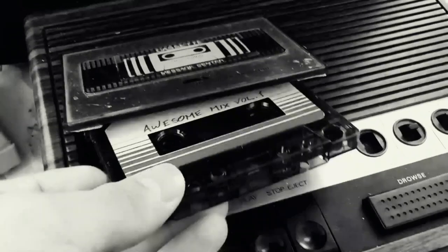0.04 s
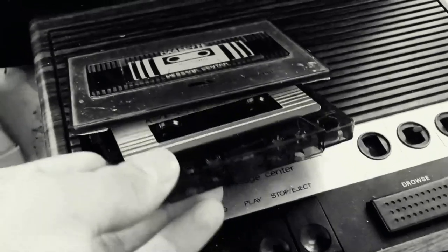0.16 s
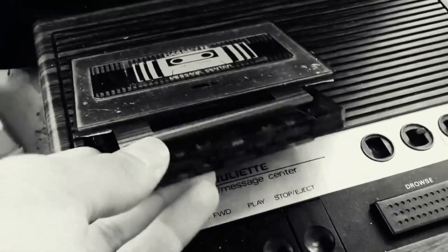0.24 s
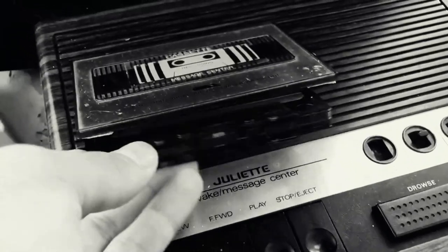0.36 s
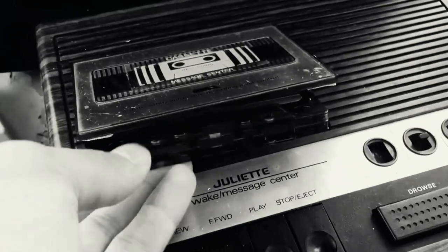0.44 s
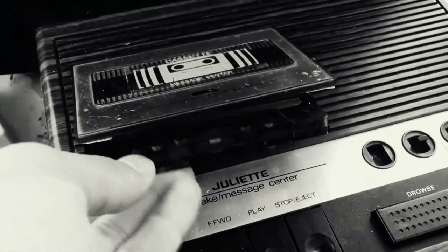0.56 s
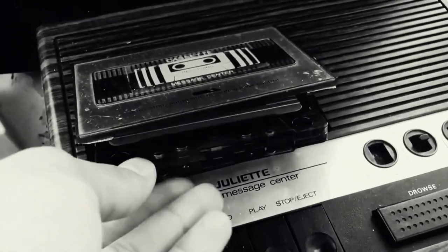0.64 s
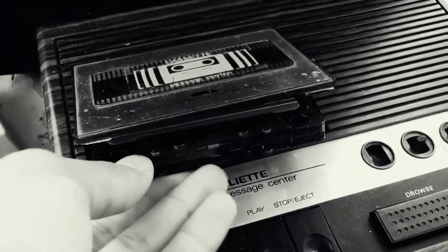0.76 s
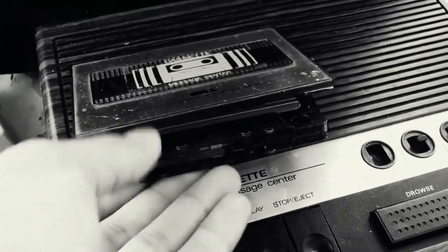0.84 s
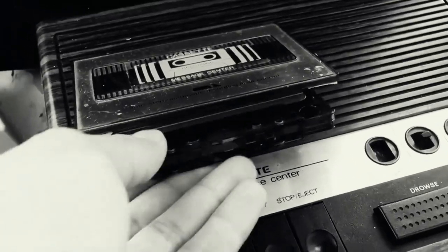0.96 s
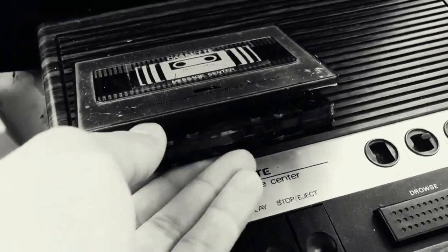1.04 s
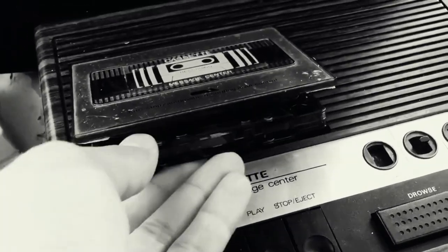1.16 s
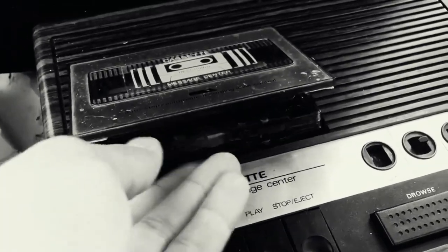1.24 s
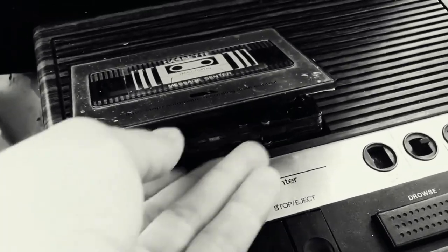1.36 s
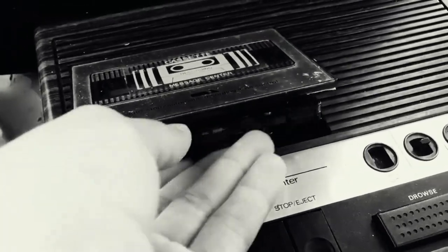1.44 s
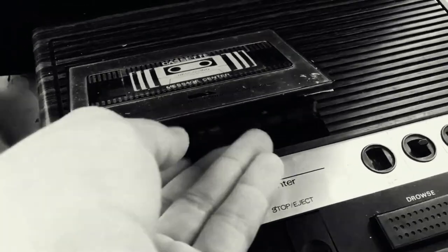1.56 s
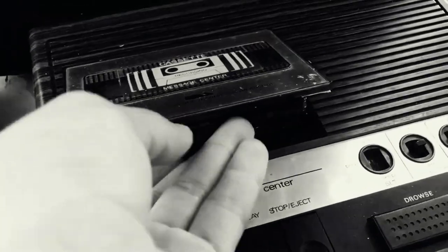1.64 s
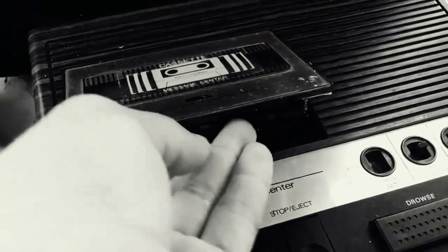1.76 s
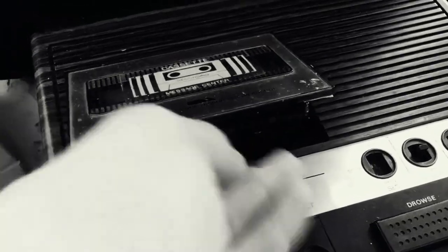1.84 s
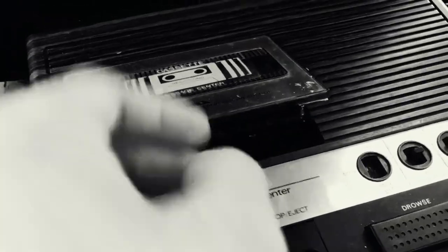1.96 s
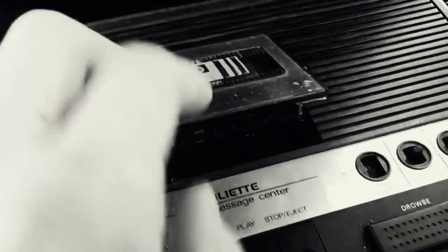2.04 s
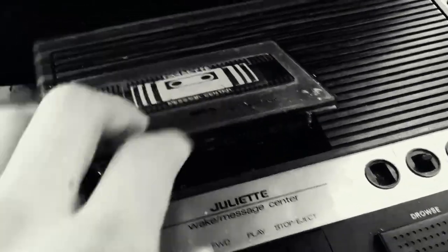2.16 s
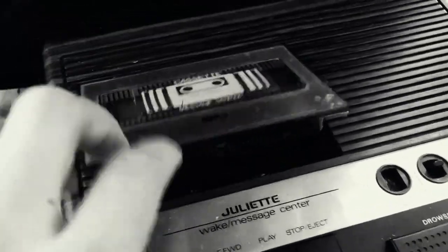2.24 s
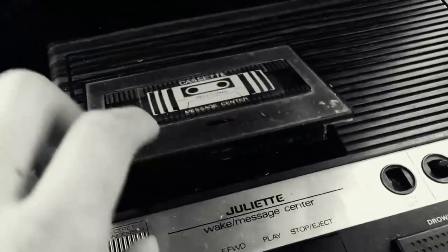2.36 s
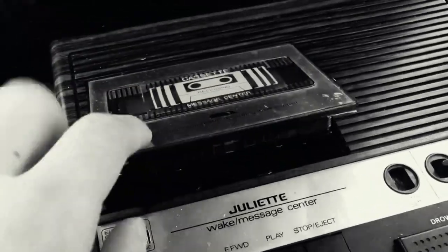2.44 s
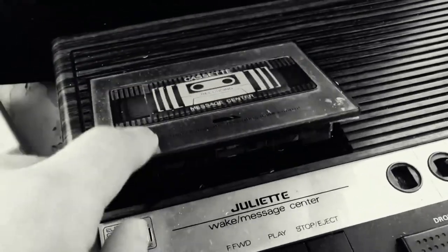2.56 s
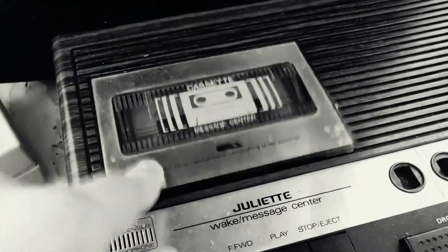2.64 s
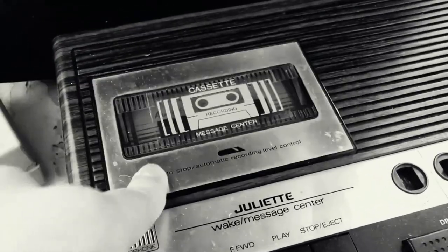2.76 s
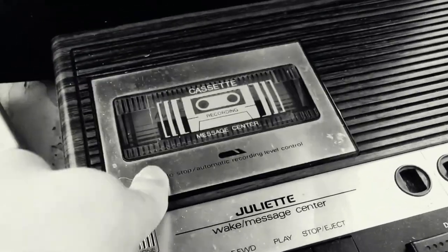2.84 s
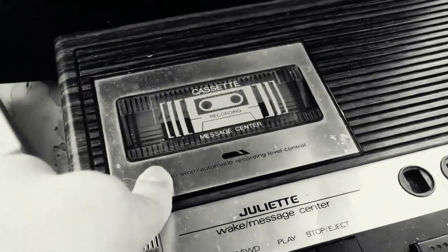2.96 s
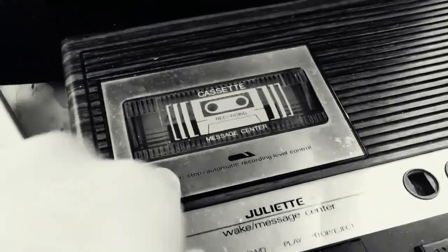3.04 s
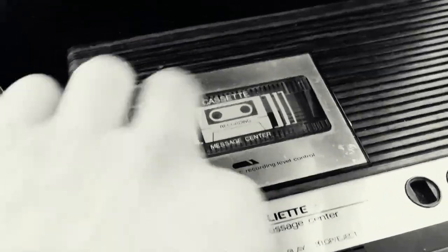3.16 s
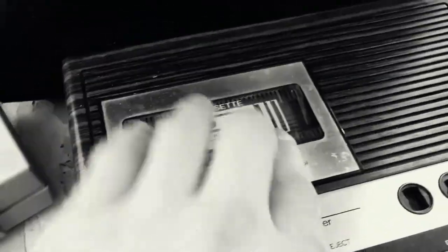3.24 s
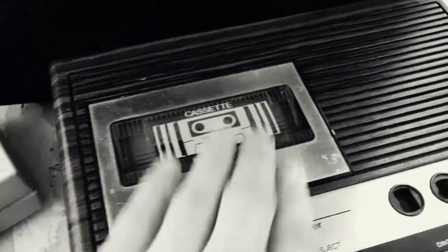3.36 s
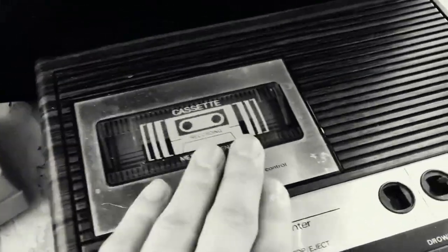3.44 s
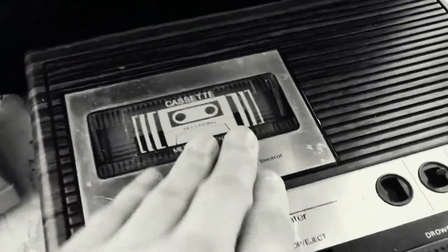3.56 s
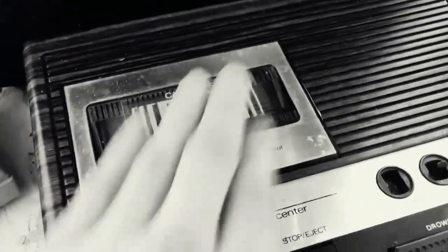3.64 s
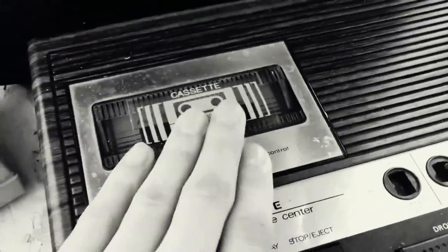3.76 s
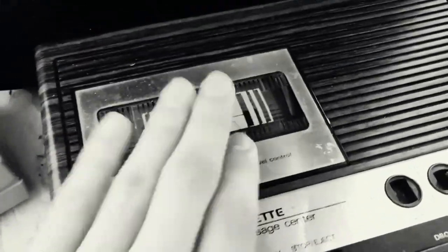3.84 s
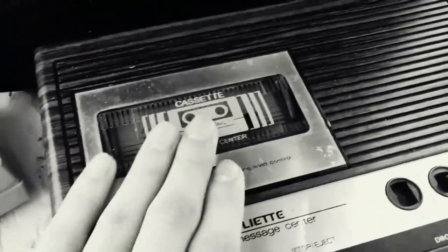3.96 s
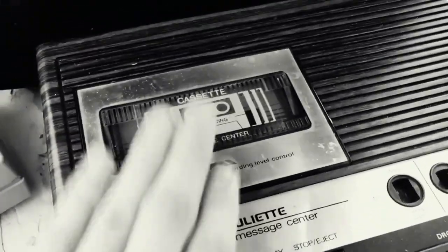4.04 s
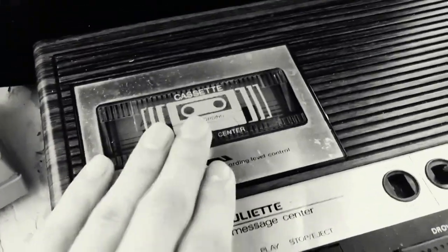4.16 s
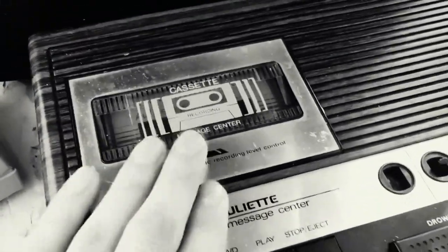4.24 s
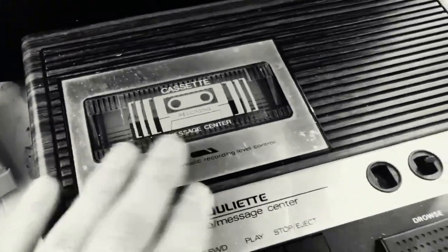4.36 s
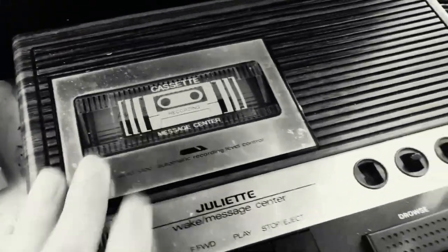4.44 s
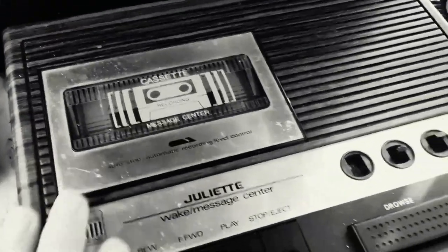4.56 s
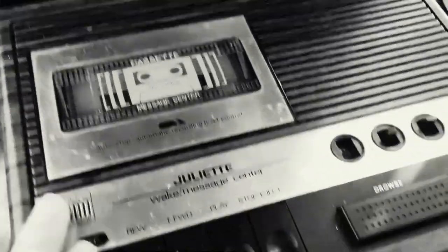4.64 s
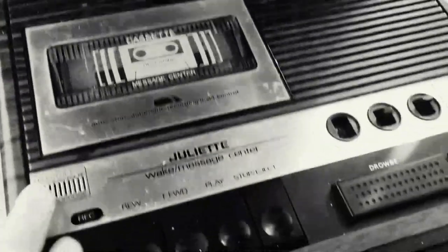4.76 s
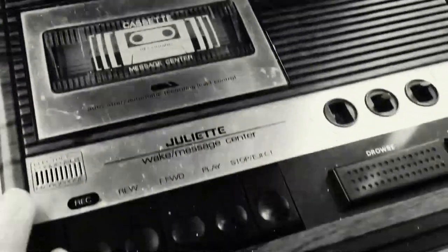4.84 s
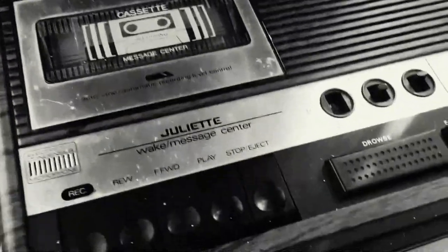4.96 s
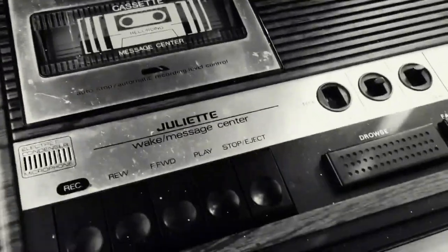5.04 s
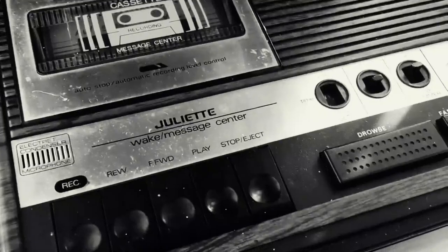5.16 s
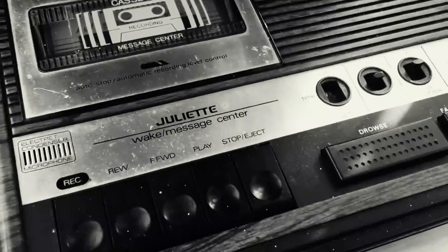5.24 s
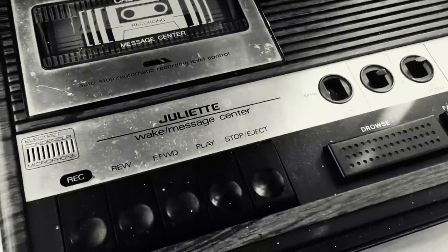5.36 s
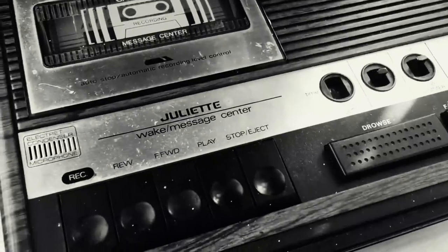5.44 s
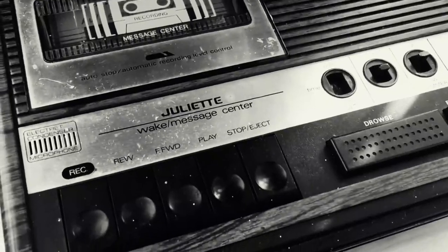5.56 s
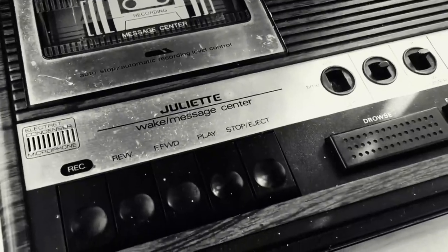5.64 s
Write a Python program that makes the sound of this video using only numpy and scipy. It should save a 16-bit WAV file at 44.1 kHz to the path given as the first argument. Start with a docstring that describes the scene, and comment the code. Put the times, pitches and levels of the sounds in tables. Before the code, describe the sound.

A plastic cassette clatters into a recorder, the door clicks shut, and fingers tap on it over a steady low fan hum.

```python
"""A fan motor hums and rushes throughout. From 0.1 s a cassette slides into a tabletop recorder:
plastic scrapes, skin hisses, each contact rings the case. From 1.4 s the sprung door is pushed shut
and its steel leaf spring pings. From 3.3 s fingers tap the door, which slaps its seat. A last rub
and a faint whistle come near 5.2 s. A gain control ducks after each loud knock and slowly recovers."""
import sys
import numpy as np
from scipy import signal
from scipy.fft import rfft, irfft, next_fast_len
from scipy.io import wavfile
from scipy.ndimage import uniform_filter1d, minimum_filter1d, map_coordinates

SR = 44100
rng = np.random.default_rng(int(sys.argv[2]) if len(sys.argv) > 2 else 0)


def transcribe(signal):
    """Save signal, clipped to [-1, 1], as a 16-bit WAV file at the path in sys.argv[1]."""
    frames = np.atleast_2d(signal).T
    limited = np.clip(frames, -1, 1)
    pcm = np.round(limited * 32767).astype(np.int16)
    wavfile.write(sys.argv[1], SR, pcm)


N = 251370

# Air rush spectrum. Each row: frequency in Hz, relative density in dB.
RUSH_SPECTRUM = [(20, -54), (30, -28), (53, -1), (206, -4.5), (335, -13), (394, -15), (591, -30),
                 (1020, -23), (1290, -26), (1890, -31), (2760, -36), (4870, -42.5), (9500, -42.5),
                 (10500, -48), (16000, -50.5)]
# Fan housing resonances. Each row: centre in Hz, width in Hz, gain over the rush in dB.
HOUSING_MODES = [(659, 17, 11.5), (1050, 76, 9), (1569, 20, 8), (1995, 26, 7.5)]
# Motor hum. Each row: multiple of the shaft rate, rms level in dB.
SHAFT_ORDERS = [(2, -30), (3, -32), (4, -28.5), (5, -38.5), (7, -36), (8, -33.5), (9, -36.5), (10, -39),
                (14, -46.5)]
# Cassette and door contacts. Each row: start in seconds, thud in dB, snap in dB,
# base t60 in seconds, frequency favoured by the place of contact in Hz.
CASE_CONTACTS = [(.1108, 0, -9, 0.073, 1220), (.1442, -1, -2.5, 0.027, 3130), (.1681, -5, -4, .043, 2620),
                 (.188, -17, -24, .11, 640), (.2345, -12.5, -6.5, 0.074, 890),
                 (.3193, -18.5, -48, .086, 1630), (.3722, -39, -21.5, .088, 3930),
                 (.4186, -20, -24, 0.05, 3350), (.4385, -26.5, -20, 0.046, 3280),
                 (.4754, -24, -20, 0.072, 970), (.5064, -17.5, -20.5, 0.12, 2230),
                 (.524, -24, -28, 0.03, 1790), (.538, -14.5, -38, 0.11, 1030),
                 (.7508, -11, -18, 0.093, 980), (.772, -16, -28, .068, 570),
                 (.9329, -10.5, -8, 0.031, 3550), (1.0242, -12.5, -6.5, 0.033, 1540),
                 (1.037, -19.5, -19, 0.042, 1050), (1.0551, -5, -16, 0.034, 3300),
                 (1.09, -14, 0, 0.035, 1660), (1.1479, -25, -19, 0.01, 3270),
                 (1.2202, -12.5, -11.5, 0.018, 1780), (1.2492, -22, -25, 0.036, 1060),
                 (1.417, -19.5, -34, .04, 560), (1.4253, -11, 2.5, 0.015, 1610),
                 (1.54, -14.5, -36, 0.048, 1810), (1.5525, -30, -20, .02, 6300),
                 (1.559, -15, -21.5, .029, 6500), (1.6059, -22, -20, 0.043, 950),
                 (1.6957, -24.5, -19, 0.037, 1640), (1.7326, -23, -31, 0.046, 1860),
                 (1.7445, -23, -11, 0.026, 4940), (1.7675, -3, 6, 0.016, 626), (1.79, -15, -33, 0.18, 780),
                 (1.8064, -6, 0.5, 0.032, 895), (2.3227, -13.5, -18, .047, 890),
                 (2.4075, -20, -18, .056, 1740), (2.421, -2, 2.5, 0.01, 864), (2.437, -15, -4, 0.055, 1140),
                 (2.5173, -22, -18.5, 0.047, 326), (2.5318, -14, -4, 0.012, 855),
                 (2.5457, -5.5, 1, 0.042, 920), (2.555, 2.5, 4.5, 0.071, 1300), (2.568, -3, 6, 0.018, 1904),
                 (2.587, -18, -2, 0.034, 3230), (2.601, -18.5, 2, 0.037, 1710),
                 (2.7757, -28, -19.5, 0.045, 5670), (2.8016, -4, 1.5, 0.1, 920),
                 (2.81, -1, 6.5, 0.058, 1900), (2.82, 5.5, 4, 0.038, 865), (2.831, -12, -8, 0.05, 850),
                 (2.852, 1, -7, 0.0084, 422), (2.9713, -14.5, 2.5, .022, 2700),
                 (3.0167, -11.5, -0.5, 0.035, 2100), (3.0511, -5, -9.5, 0.042, 1820),
                 (3.062, 2, -5, 0.017, 487), (3.0985, -23, -14.5, .059, 2930),
                 (3.1109, -27, -22, 0.067, 2700), (3.1279, -50, -13.5, 0.032, 8400),
                 (3.6971, -15, -24.5, 0.032, 2260)]
# Plastic case resonances. Each row: centre in Hz, width in Hz, gain in dB.
CASE_MODES = [(208.4, 13.7, 0.5), (356, 92, 2), (423, 57, -3.5), (507.7, 60, 3), (625, 186, -2.5),
              (739, 131, 4), (906, 123, 0.5), (987, 69, 7.5), (1220, 200, -6.5), (1487, 177, 4),
              (1828, 86, 2.5), (2111, 86, 6.5), (2670, 440, -9), (2994, 73, -0.5), (3280, 133, -4.5),
              (3606, 385, -2), (4800, 370, -10), (5320, 180, 1), (6370, 1500, -10.5), (9240, 180, -9),
              (11250, 400, -17), (13600, 6600, -17)]
# Centres of the thud, knock, click and snap bands in Hz.
BAND_CENTRES_HZ = [580, 1300, 2800, 10000]
# Sliding plastic and skin. Each row: start in seconds, end in seconds, scrape in dB, hiss in dB.
RUB_STROKES = [(0.127, 0.172, -12, -49), (0.396, 0.486, -36, -73), (0.494, 0.547, -26, -49),
               (0.682, 0.763, -29, -40), (0.73, 0.797, -38.5, -46.5), (0.925, 0.988, -32, -41),
               (1.03, 1.142, -44, -40.5), (1.41, 1.458, -23, -56), (1.515, 1.63, -32.5, -56),
               (1.714, 1.847, -27.5, -28.5), (1.935, 2, -37, -45), (2.37, 2.47, -30.5, -33),
               (2.493, 2.62, -26, -33), (2.776, 2.89, -20.5, -36), (2.933, 3.136, -29.5, -41),
               (3.305, 3.346, -59, -43), (3.83, 3.878, -25, -47), (4.018, 4.127, -30, -44),
               (4.223, 4.274, -38, -54), (4.417, 4.474, -34, -41), (4.493, 4.547, -65, -40),
               (4.58, 4.694, -34, -39), (5.11, 5.273, -40, -42.5), (5.327, 5.376, -75, -45)]
# Plastic friction ahead of the case modes. Each row: frequency in Hz, relative density in dB.
SCRAPE_SPECTRUM = [(200, -32), (600, -1), (1500, 7.5), (3500, -7), (8000, -17.5), (16000, -27)]
# Skin friction. Each row: frequency in Hz, relative density in dB.
HISS_SPECTRUM = [(2000, -40), (6000, 6), (10000, 4), (13000, 9), (15500, 5)]
# Leaf spring modes. Each row: frequency in Hz, t60 in seconds.
SPRING_MODES = [(4764, .045), (8619, .07), (11330, .05), (13045, .075)]
# Spring plucks. Each row: start in seconds, level in dB, favoured frequency in Hz.
SPRING_PLUCKS = [(1.388, -39, 13045), (1.743, -15, 4764), (1.806, -5, 4764), (1.812, -13, 12200),
                 (2.443, -22, 10500), (2.568, -24, 13045), (2.574, -13, 4764), (2.604, -30, 10000),
                 (2.806, -8, 8619), (2.858, -27, 11330), (3.07, -32, 11330)]
# Taps on the shut door. Each row: start in seconds, pad thud in dB, seat slap in dB,
# favoured pad frequency in Hz, favoured seat frequency in Hz.
DOOR_TAPS = [(3.3, -16.5, -40, 243, 1150), (3.5252, 2, -2, 452, 1820), (3.731, -12.5, -11, 334, 1030),
             (3.826, 6.5, 1.5, 242, 836), (3.952, -13, -15, 350, 990), (3.965, -20, -13.5, 210, 910),
             (4.0542, 5, 3.5, 443, 2260), (4.2215, 5, 2, 458, 2430), (4.4087, 2.5, 0.5, 392, 1550),
             (4.613, -4, -19, 356, 5400)]


def amp(db):
    """dB to gain."""
    return 10 ** (np.asarray(db) / 20)


def unit_rms(x):
    """Scale to rms 1."""
    return x / np.sqrt(np.mean(x ** 2) + 1e-20)


def curve_db(points, hz):
    """Interpolate (Hz, dB) points on a log frequency axis."""
    knots_hz, db = np.transpose(points)
    return np.interp(np.log(hz + 1), np.log(knots_hz + 1), db)


def wobble(rate_hz):
    """Smooth random curve with knots at rate_hz."""
    knots = rng.standard_normal(int(N * rate_hz / SR) + 4)
    return map_coordinates(knots, [np.arange(N) * rate_hz / SR])


def filtered(x, response):
    """Apply a complex frequency response."""
    size = next_fast_len(x.shape[-1] + 4096)
    return irfft(rfft(x, size) * response(np.fft.rfftfreq(size, 1 / SR)), size)[..., :x.shape[-1]]


def resonances(modes, f):
    """Causal sum of (Hz, width in Hz, dB) modes, alternating in sign."""
    return sum((-1) ** k * amp(db) * 1j * f * width / (hz * hz - f * f + 1j * f * width)
               for k, (hz, width, db) in enumerate(modes))


def window(start_s, end_s, edge_s):
    """Gate with linear edges."""
    t = np.arange(N) / SR
    return np.clip(np.minimum(t - start_s, end_s - t) / edge_s, 0, 1)


def patchy(x, depth_db):
    """Random gain patches in time and frequency."""
    spectra = signal.stft(x, nperseg=512)[2]
    field = uniform_filter1d(rng.standard_normal(spectra.shape), size=5, axis=0)
    field = uniform_filter1d(field, size=8, axis=1)
    return signal.istft(spectra * amp(depth_db * unit_rms(field)), nperseg=512)[1][:N]


def fan(shaft_hz=28.45):
    """Air rushes through the housing; unsteady shaft orders hum; the treble ticks once a turn."""
    shaft_rad = 2 * np.pi * np.cumsum(shaft_hz * (1 + 0.00401 * wobble(2.898))) / SR
    rush = filtered(rng.standard_normal(N),
                    lambda f: amp(curve_db(RUSH_SPECTRUM, f)) * (1 + abs(resonances(HOUSING_MODES, f))))
    rush = amp(-22.5 + 1.9 * wobble(4.125)) * unit_rms(patchy(rush, depth_db=2))
    hum = sum(amp(db + 3 + 3.7 * wobble(8)) * np.sin(order * shaft_rad + 0.7 * wobble(10))
              for order, db in SHAFT_ORDERS)
    pulses = .4 + np.exp(2.5 * (np.cos(shaft_rad) - 1)) * amp(3 * wobble(20))
    treble = filtered(rng.standard_normal(N), lambda f: resonances([(6290, 930, 0)], f) ** 2)
    return rush + hum + amp(-50) * unit_rms(pulses * treble)


def case_knocks(events, broad_db, focus_db, place_db, rise_s, t60_scales, tail_db, blow, low_hz=85):
    """Blow and chatter ring the case in four bands; the place of contact favours some modes."""
    out, t = np.zeros(N + 6000), np.arange(6000) / SR
    outline = [(hz, db) for hz, _, db in CASE_MODES]
    for start_s, thud_db, snap_db, t60_s, place_hz in events:
        log_centres = np.log(BAND_CENTRES_HZ)
        favoured = np.argmin(np.abs(log_centres - np.log(place_hz)))
        log_centres[favoured] = np.log(place_hz)
        peaks_db = np.interp(log_centres, log_centres[[0, -1]], [thud_db, snap_db])
        peaks_db[favoured] += place_db
        modes = []
        for hz, width, db in CASE_MODES:
            nearness = np.exp(-(np.log(hz / place_hz) / 0.091) ** 2)
            modes.append((hz, width, db + focus_db * nearness + rng.normal(0, 1.54)))
        decay_db = -60 * t / (t60_s * np.array(t60_scales)[:, None])
        envelope = (1 - np.exp(-t / rise_s)) * (amp(decay_db) + amp(tail_db + decay_db / 4))
        force = envelope * rng.standard_normal(envelope.shape)
        force[:, round(rise_s * SR)] += blow * np.linalg.norm(force, axis=1)  # first, hardest touch

        def band_responses(f):
            """The small case radiates nothing below low_hz."""
            knots = [np.log(low_hz), *log_centres]
            bands = np.array([np.interp(np.log(f + 1), knots, row) ** 2 for row in np.eye(5)[1:]])
            return bands * (resonances(modes, f) + amp(broad_db + curve_db(outline, f)))

        rings = filtered(force, band_responses)
        out[round(start_s * SR):][:len(t)] += amp(peaks_db) / np.abs(rings).max(axis=1) @ rings
    return out[:N]


def contacts():
    """Cassette and door strike the case; high bands die sooner."""
    return case_knocks(CASE_CONTACTS, broad_db=-7, focus_db=3, place_db=5.5, rise_s=0.00035,
                       t60_scales=[0.77, 0.63, 0.56, 0.42], tail_db=-7.5, blow=0.18)


def rubs(grains_per_s=400):
    """Stick-slip friction: clumped grit rings the case, skin hisses."""
    clumps = amp(3.5 * wobble(150) + 2.5 * wobble(40))
    grit = clumps * rng.standard_normal(N) * (0.24 + 3 * (rng.random(N) < grains_per_s / SR))
    modes = [(hz, width, 0) for hz, width, _ in CASE_MODES]
    scrape = unit_rms(filtered(grit, lambda f: amp(curve_db(SCRAPE_SPECTRUM, f)) * resonances(modes, f)))
    hiss = filtered(rng.standard_normal(N), lambda f: amp(curve_db(HISS_SPECTRUM, f)))
    hiss = unit_rms(np.sqrt(clumps) * patchy(hiss, depth_db=3.5))
    return sum(window(start_s, end_s, (end_s - start_s) / 4)
               * (amp(scrape_db) * scrape + amp(hiss_db) * hiss)
               for start_s, end_s, scrape_db, hiss_db in RUB_STROKES)


def leaf_spring(fall_db_per_octave=26, rise_s=0.00074):
    """Plucked steel modes, weaker away from the favoured frequency."""
    out, t = np.zeros(N + 8192), np.arange(8192) / SR
    for start_s, pluck_db, favoured_hz in SPRING_PLUCKS:
        for hz, t60_s in SPRING_MODES:
            db = pluck_db - fall_db_per_octave * abs(np.log2(hz / favoured_hz))
            envelope = amp(db - 60 * t / t60_s) * (1 - np.exp(-t / rise_s))
            tone = np.sin(2 * np.pi * hz * t + .5 * rng.standard_normal())
            out[round(start_s * SR):][:len(t)] += envelope * tone
    return out[:N]


def finger_taps(t60_s=0.032, seat_delay_s=0.0042, pad_dull_db=26, snap_slope=2.3):
    """The soft pad lands, then the door slaps its seat, brighter when harder."""
    pads = [(start_s, db, db - pad_dull_db, t60_s, hz) for start_s, db, _, hz, _ in DOOR_TAPS]
    seats = [(start_s + seat_delay_s, db, snap_slope * db - 6.5, t60_s, hz)
             for start_s, _, db, _, hz in DOOR_TAPS]
    thuds = case_knocks(pads, broad_db=-10.5, focus_db=7.5, place_db=3.5, rise_s=0.0036,
                        t60_scales=[1.2, 0.87, 2.2, 1.8], tail_db=-24.5, blow=0.72)
    slaps = case_knocks(seats, broad_db=-5.5, focus_db=-1, place_db=3.5, rise_s=0.0018,
                        t60_scales=[1.47, 1.73, 1.6, 1.6], tail_db=-25, blow=0.57)
    return thuds + slaps


def whistle(hz=2667, db=-43):
    """One short thin tone."""
    gate = window(start_s=5.22, end_s=5.32, edge_s=0.0059)
    return amp(db) * gate * np.sin(2 * np.pi * hz * np.arange(N) / SR)


def scene():
    """Mono sum of all sources."""
    return (fan() + contacts() + rubs() + leaf_spring() + finger_taps() + whistle())[None]


def gain_control(x, threshold_db=-4, attack=0.33, release_db_per_s=16.5, ease_db=15, block=88):
    """Peaks over the threshold cut the gain; recovery slows over the last ease_db."""
    peaks_db = 20 * np.log10(-minimum_filter1d(-np.abs(x), 2 * block)[::block] + 1e-6)
    cuts_db, cut_db = np.zeros(len(peaks_db)), 9.5  # starts ducked
    for i, db in enumerate(peaks_db):
        excess_db = max(0, db - cut_db - threshold_db)
        recovery_db = release_db_per_s * block / SR * min(1, cut_db / ease_db)
        cut_db = max(0, cut_db + attack * excess_db - recovery_db)
        cuts_db[i] = cut_db
    return x * amp(-np.interp(np.arange(N), np.arange(len(cuts_db)) * block, cuts_db))


def record(dry, ceiling=0.93, top_hz=16900):
    """Gain control, soft clip, silent start, band limit with 2.5 dB passband gain."""
    x = gain_control(dry[0])
    x = x / (1 + np.abs(x / ceiling) ** 20) ** (1 / 20)
    x = x * window(start_s=0.047, end_s=np.inf, edge_s=0.004)
    return filtered(x, lambda f: (f < top_hz) * amp(curve_db([(15700, 2.5), (15900, -33)], f)))[None]


dry = scene()
out = record(dry)
transcribe(out)
```